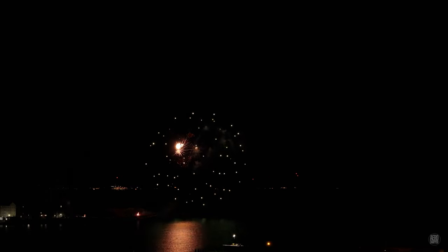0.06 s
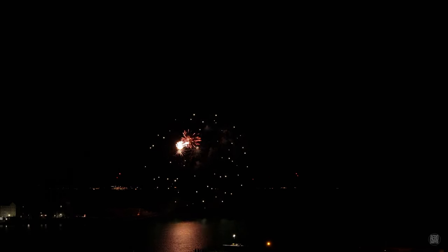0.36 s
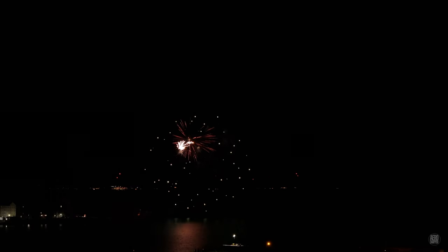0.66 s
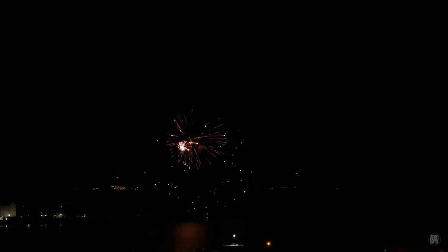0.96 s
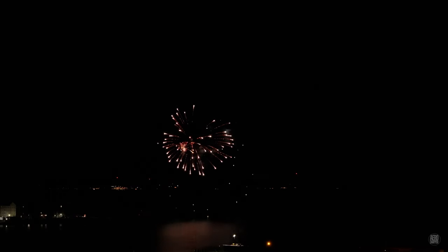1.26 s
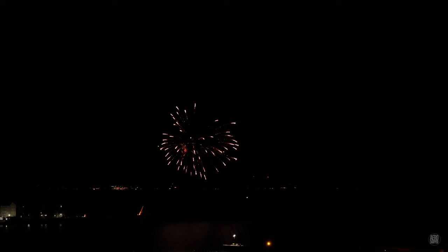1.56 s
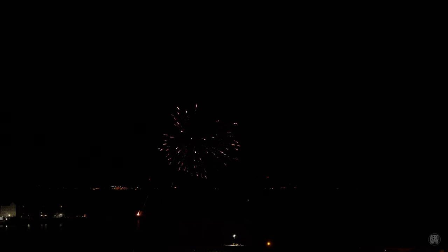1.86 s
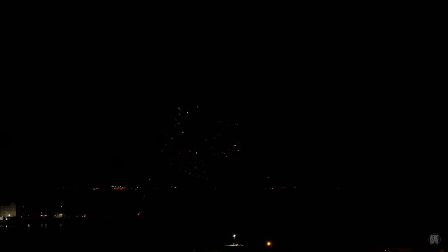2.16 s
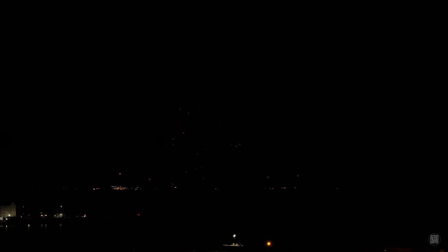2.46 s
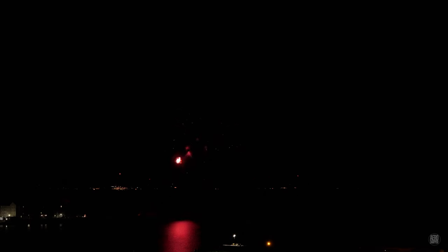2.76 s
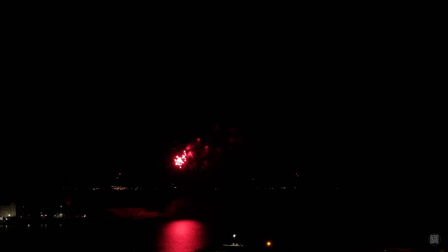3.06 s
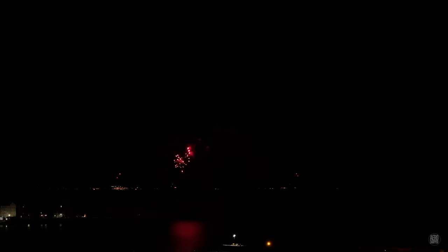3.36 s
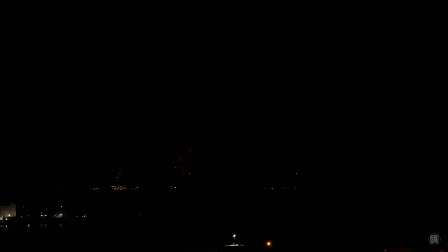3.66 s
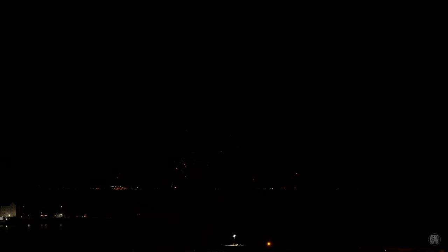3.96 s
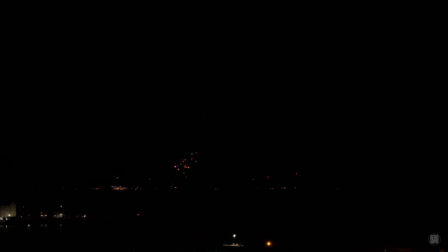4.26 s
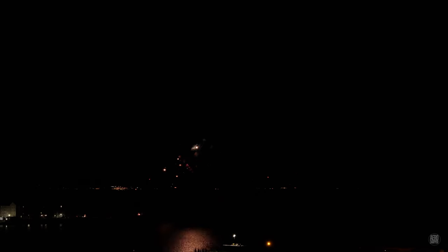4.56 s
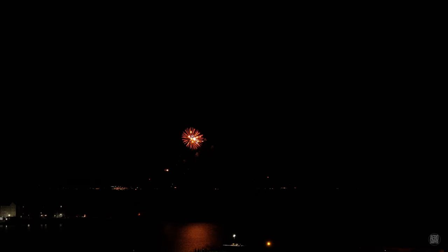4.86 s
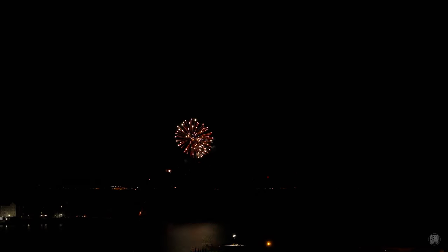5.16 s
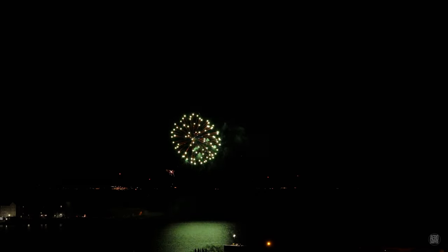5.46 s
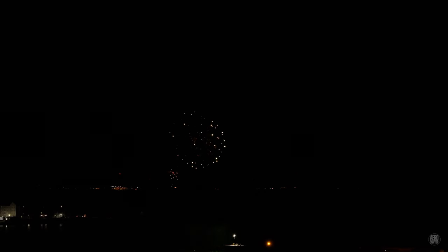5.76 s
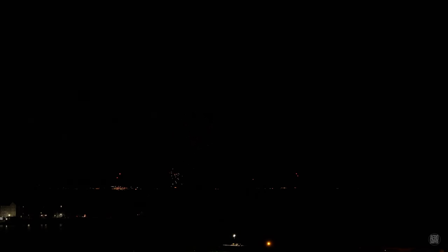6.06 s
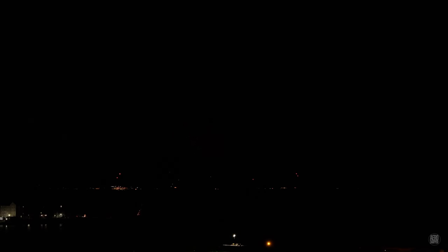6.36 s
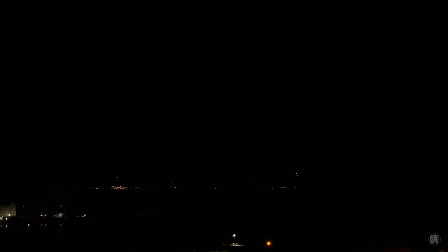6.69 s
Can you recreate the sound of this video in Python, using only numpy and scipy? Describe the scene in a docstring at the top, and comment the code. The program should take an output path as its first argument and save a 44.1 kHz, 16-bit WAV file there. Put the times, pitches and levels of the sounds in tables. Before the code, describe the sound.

Far-off fireworks burst three times with dull cracks and deep, echoing booms, while a camera motor whines faintly nearby.

```python
"""By open water at night, three firework shells burst far off. Each arrives as a dull crack that sinks
into a deep boom, a pulse of air pressure that then echoes and rolls along the shore. Farther bursts and
one late echo thump faintly over the low rumble of the town. Close by, a camera's motor whines over a
steady hiss, and a jacket rustles softly as cloth slides over cloth."""
import sys
import numpy as np
from scipy import signal
from scipy.fft import rfft, irfft, next_fast_len
from scipy.io import wavfile

SR = 44100
rng = np.random.default_rng(int(sys.argv[2]) if len(sys.argv) > 2 else 0)


def to_wav(sig):
    """Store sig (one row per channel, or 1-D mono) as 16-bit WAV at the path in sys.argv[1].

    Samples outside -1..1 are clipped; the rate is SR.
    """
    pcm = np.clip(np.atleast_2d(sig), -1, 1) * 32767
    pcm = np.round(pcm).astype(np.int16)
    wavfile.write(sys.argv[1], SR, pcm.T)  # frames by channels


N = 305613
TIME = np.arange(N) / SR


def from_db(db):
    """Turn decibels into a number to multiply a sound by."""
    return 10 ** (np.asarray(db) / 20)


def rms_one(x):
    """Scale a sound so that its average strength (rms) is 1."""
    return x / np.sqrt(np.mean(x ** 2) + 1e-20)


def level(rows):
    """A volume curve that joins points of t/s, level/dB."""
    return from_db(np.interp(TIME, *np.transpose(rows)))


def band(x, hz, width_hz, order=3):
    """Keep only the frequencies in a band around hz."""
    low = np.hypot(hz, width_hz / 2) - width_hz / 2
    high = min(low + width_hz, SR / 2 - 100)
    return signal.sosfilt(signal.butter(order, [low, high], "band", fs=SR, output="sos"), x + 1e-18)


def dull(x, hz):
    """Air and soft ground take away the treble above hz."""
    return signal.sosfilt(signal.butter(2, hz, fs=SR, output="sos"), x + 1e-18)


def add(out, s, sound):
    """Mix a sound in, starting at s seconds."""
    start = int(np.clip(round(s * SR), 0, len(out)))
    out[start:start + len(sound)] += sound[:len(out) - start]


def noise(colour):
    """Steady noise of strength 1, its tone shaped by points of f/Hz, level/dB."""
    hz, db = np.transpose(colour)
    size = next_fast_len(N)
    freqs = np.fft.rfftfreq(size, 1 / SR)
    gain = from_db(np.interp(np.log(freqs + 1), np.log(hz), db))
    return rms_one(irfft(rfft(rng.standard_normal(size)) * gain, size)[:N])


def noise_band(size, hz, width_hz, order=3):
    """Noise of strength 1 in a band around hz."""
    return rms_one(band(rng.standard_normal(size), hz, width_hz, order))


def drift(per_s):
    """A random wander, roughly between -1 and 1, that finds a new value per_s times a second."""
    return np.interp(TIME * per_s, np.arange(1000), rng.standard_normal(1000))


# how the rumble rises and falls: t/s, level/dB
RUMBLE_LEVELS = [(0, -53), (.8, -49.5), (2.85, -51.5), (3.4, -43.5), (3.9, -47.5), (4.6, -45), (4.98, -50),
                 (5.14, -42), (5.5, -49), (6.6, -49), (6.93, -46.5)]
# the rumble's tone, from low to high: f/Hz, level/dB
RUMBLE_TONE = [(20, -41), (32, -25.5), (45, 5), (58, 6), (80, 5.5), (105, -1), (150, -9.5), (220, -7),
               (320, -24), (600, -57.5)]

def town(boost_db=1):
    """The town and far fireworks blend into a low rumble that swells and sinks."""
    return from_db(boost_db) * level(RUMBLE_LEVELS) * noise(RUMBLE_TONE)


# the notes in the motor's whine: f/Hz, level/dB
MOTOR_NOTES = [(730, -67), (862, -63), (1226, -77.5), (1592, -79), (1922.7, -63.5), (2387, -82),
               (3183, -87)]
# the tone of the air and microphone hiss: f/Hz, level/dB
HISS_TONE = [(100, -21), (300, 5), (500, 0.5), (760, 2.5), (1000, -7), (1300, -3), (1700, -10), (2050, -7),
             (2500, -15.5), (3150, -20), (3600, -24), (5200, -28), (8000, -36.5), (12000, -42)]

def camera(waver=0.00052, flutter_db=1.15, hiss_db=-57.5, sizzle_db=-82):
    """The motor's notes waver in pitch together, over hiss and a thin, high sizzle."""
    motor_time = np.cumsum(1 + waver * drift(per_s=12)) / SR
    whine = np.zeros(N)
    for hz, db in MOTOR_NOTES:
        height = np.sqrt(2) * from_db(db + flutter_db * drift(per_s=12))
        whine += height * np.sin(2 * np.pi * hz * motor_time)
    sizzle = from_db(sizzle_db) * noise_band(N, hz=13520, width_hz=950, order=2)
    return whine + from_db(hiss_db) * noise(HISS_TONE) + sizzle


# the tone of sliding cloth: f/Hz, level/dB
CLOTH_TONE = [(1500, -13), (3300, 2.5), (5300, -0.5), (7000, 0.5), (10000, -2), (12000, -9.5),
              (15500, -4.5)]
# pitches where the microphone and its case colour the rustle: f/Hz, width/Hz, level/dB
MIC_RESONANCES = [(3360, 170, -10), (4380, 200, -11.5), (7450, 400, -12.5), (13600, 1800, -15.5)]
# faint stirring until the wearer settles: t/s, level/dB
CLOTH_STIRRING = [(0, -84.5), (1.6, -87), (2.8, -81.5), (4.5, -84), (5.3, -96)]
# sleeve strokes, and a faint, brief high fizz right at the second boom: t/s, length/s, level/dB
STROKES_AND_FIZZ = [(0.955, 0.26, -66), (2.105, .14, -66.5), (3.28, .05, -78), (3.64, .07, -71.5),
                    (3.8, .12, -78), (3.964, 0.034, -72.5), (4.14, .02, -77)]

def jacket(grain_db=1.0, swell_s=0.044, fade_s=0.067):
    """Cloth slides unevenly over cloth; each stroke, and the one fizz, swells, holds and fades."""
    colour = sum(from_db(db) * noise_band(N, hz, width, order=1) for hz, width, db in MIC_RESONANCES)
    power = level(CLOTH_STIRRING) ** 2
    for s, length, db in STROKES_AND_FIZZ:
        before = np.maximum(s - TIME, 0)
        after = np.maximum(TIME - s - length, 0)
        power += (from_db(db) * np.exp(-before / swell_s - after / fade_s)) ** 2
    grain = from_db(grain_db * drift(per_s=92))
    return np.sqrt(power) * grain * (noise(CLOTH_TONE) + colour)


# small ticks of the fabric: t/s, f/Hz, peak level/dB
FABRIC_TICKS = [(.187, 4200, -54), (2.088, 8800, -56), (2.428, 8500, -60), (4.565, 7500, -62)]

def fabric_ticks():
    """Now and then the fabric ticks: a pulse only a few vibrations long."""
    out = np.zeros(N)
    for s, hz, db in FABRIC_TICKS:
        tick = band(signal.unit_impulse(SR // 2), hz, width_hz=0.7 * hz)
        add(out, s, from_db(db) * tick / np.abs(tick).max())
    return out


# the parts of one boom, the lowest arriving last: delay/s, f/Hz, width/Hz, level/dB
BOOM_PARTS = [(0.00042, 880, 680, -42), (0.0011, 734, 100, -35), (0.00055, 429, 163, -26.5),
              (.0002, 323.7, 113, -15.5), (0.00391, 135.9, 58, 0.73), (0.00485, 114.2, 42.2, 0.5),
              (0.01897, 257.4, 67, -13.5), (0.01944, 65.1, 28, 1.3), (.026, 40, 11, -12)]

def boom(brightness, wall_delay_s=0.0162, wall_db=-7):
    """One pulse of air pressure, smeared by its long trip and repeated by a nearby wall."""
    direct = np.zeros(SR // 2)
    pulse = signal.unit_impulse(SR // 2)
    for delay, hz, width, db in BOOM_PARTS:
        tilt_db = brightness * np.log2(hz / 70)   # brightness above 0 lifts the higher parts
        add(direct, delay, from_db(db + tilt_db) * band(pulse, hz, width))
    out = direct.copy()
    add(out, wall_delay_s, from_db(wall_db) * direct)
    return out


# far bursts and one late echo of the first shell: t/s, boom level/dB, brightness/(dB per octave)
FAINT_THUMPS = [(.652, 16.5, -4), (.815, 21, -11.5), (2.617, 16.5, -3), (3.026, 13, -5), (3.62, 16.5, -4.5),
                (4.124, 16, -0.5), (4.8, 15, -11.5), (5.319, 30.5, -13), (6.872, 22, -6.5)]

def faint_thumps():
    """Booms that travelled farther: weak, mostly dull, their crack and rolling tail lost on the way."""
    out = np.zeros(N)
    for s, boom_db, brightness in FAINT_THUMPS:
        add(out, s, from_db(boom_db) * boom(brightness))
    return out


def scatter(bands, t):
    """Countless tiny echoes blur into noise; each band falls 60 dB in its fade time."""
    out = np.zeros(len(t))
    for hz, width, db, fade_s in bands:
        blur = band(rng.standard_normal(len(t) + SR), hz, width)[SR:]   # skip the filter's warm-up
        out += from_db(db - 60 * t / fade_s) * rms_one(blur)
    return out


# the bands of the crack: f/Hz, width/Hz, level/dB, fade time/s
CRACK_BANDS = [(434, 270, 1.5, 0.15), (825, 285, -5.5, 0.12), (1380, 400, -10.5, 0.1),
               (2710, 910, -18, 0.13)]

def crack(rise_s=0.0015):
    """A shell's crack bounces off things nearby; so much air leaves it no sharp edge."""
    t = np.arange(SR) / SR
    rise = 1 - np.exp(-t / rise_s)
    return dull(scatter(CRACK_BANDS, t) * rise, hz=4500)


# the bands of the rolling tail: f/Hz, width/Hz, level/dB, fade time/s
ROLL_BANDS = [(69.3, 39.4, 0.5, 2.05), (120.8, 74.5, -1.5, 1.94), (234.6, 115, -6.5, 1.41),
              (450, 380, -22.5, 1.8)]

def shore_roll(rise_s=0.068, far_delay_s=1.083, far_spread_s=0.091, far_db=-12):
    """The uneven shore sends a boom back in clumps; the far shore adds a soft, late swell."""
    t = np.arange(3 * SR) / SR
    clumps = from_db(4.5 * np.clip(drift(per_s=40)[:len(t)], -3, 1.3))
    roll = scatter(ROLL_BANDS, t) * (1 - np.exp(-t / rise_s))
    swell = np.exp(-0.5 * ((t - far_delay_s) / far_spread_s) ** 2)
    rumble = sum(from_db(db) * noise_band(len(t), hz, width) for hz, width, db, _ in ROLL_BANDS)
    return clumps * (roll + from_db(far_db) * swell * rms_one(rumble))


# the three shells: t/s, boom level/dB, brightness/(dB per octave), crack level/dB, roll level/dB
SHELL_BURSTS = [(1.192, 39.5, 1, -31, -38), (3.2667, 41.5, 0.5, -35.5, -37), (5.178, 39, -1, -44.5, -38)]
# shore echoes: delay/s, level next to the boom/dB, added brightness/(dB per octave), dull above f/Hz
SHORE_ECHOES = [(.078, -21, -0.5, 300), (.117, -18.5, -0.5, 328), (.185, -32.5, 1.5, 300),
                (.449, -30.5, 2.5, 450)]

def shells():
    """The shells burst at about the same spot, so they all get the same echoes."""
    out = np.zeros(N)
    for s, boom_db, brightness, crack_db, roll_db in SHELL_BURSTS:
        add(out, s, from_db(boom_db) * boom(brightness))
        add(out, s, from_db(crack_db) * crack())
        add(out, s, from_db(roll_db) * shore_roll())
        for delay, echo_db, added_brightness, hz in SHORE_ECHOES:
            echo = dull(boom(brightness + added_brightness), hz)
            add(out, s + delay, from_db(boom_db + echo_db) * echo)
    return out


def scene():
    """Far fireworks and town, near camera and jacket, in one channel."""
    fireworks = shells() + faint_thumps()
    return (fireworks + town() + camera() + jacket() + fabric_ticks())[None]


def record(dry, low_cut_hz=15, high_cut_hz=15700):
    """The microphone loses the deepest bass, and the highest treble is cut off."""
    bass_cut = signal.butter(1, low_cut_hz, "high", fs=SR, output="sos")
    treble_cut = signal.ellip(12, 0.1, 80, high_cut_hz, fs=SR, output="sos")
    return signal.sosfilt(treble_cut, signal.sosfilt(bass_cut, dry))


dry = scene()
out = record(dry)
to_wav(out)
```